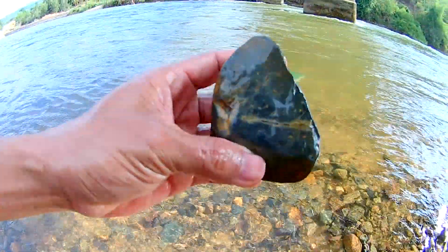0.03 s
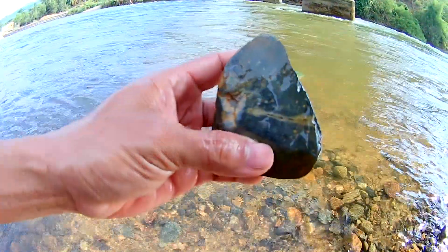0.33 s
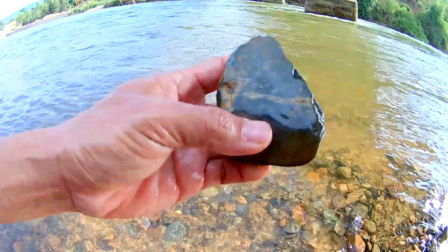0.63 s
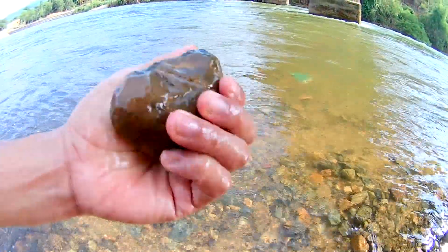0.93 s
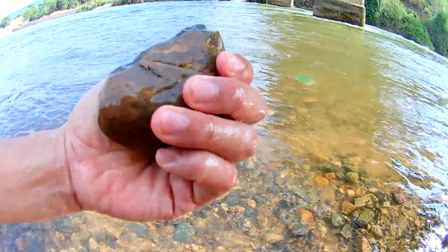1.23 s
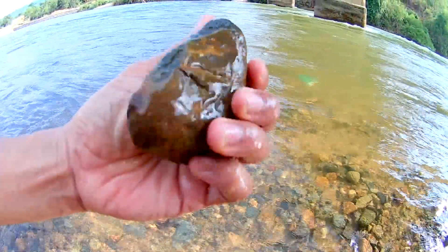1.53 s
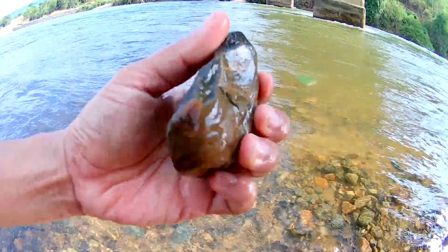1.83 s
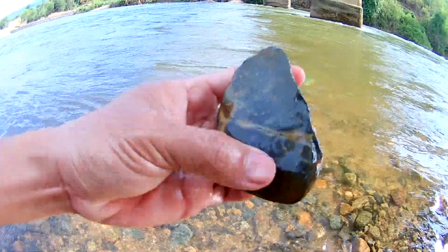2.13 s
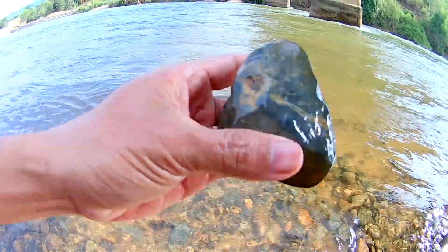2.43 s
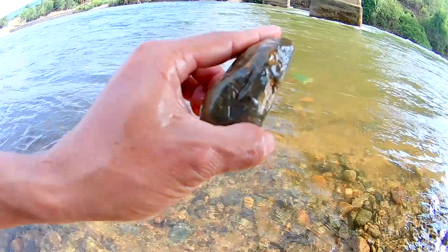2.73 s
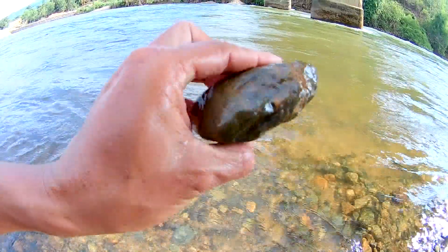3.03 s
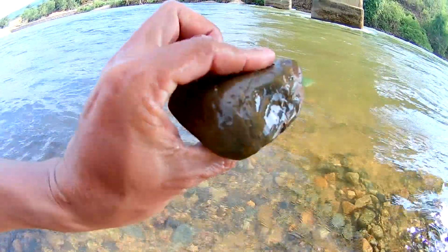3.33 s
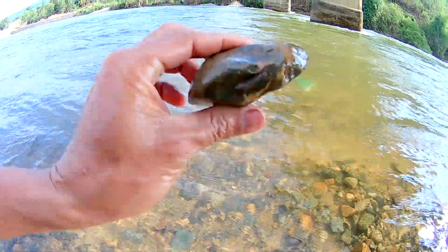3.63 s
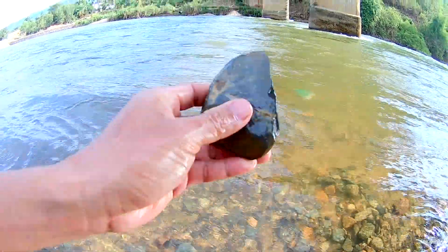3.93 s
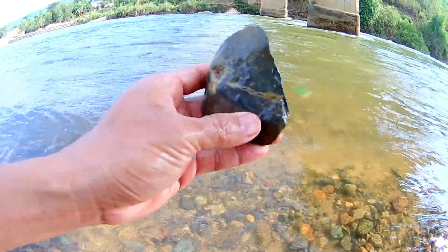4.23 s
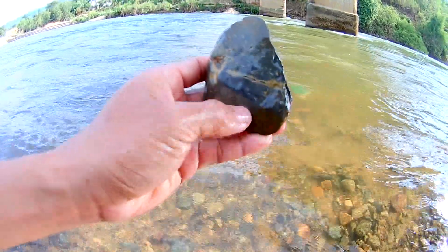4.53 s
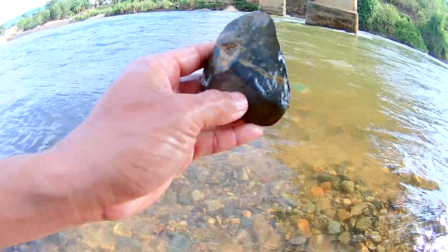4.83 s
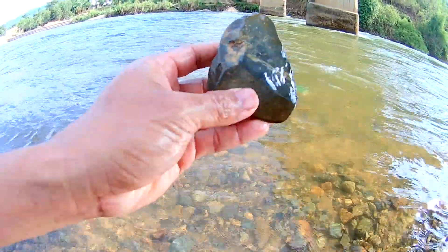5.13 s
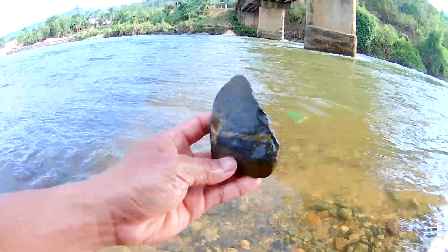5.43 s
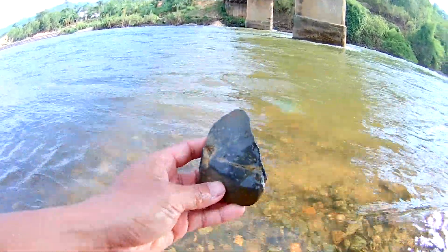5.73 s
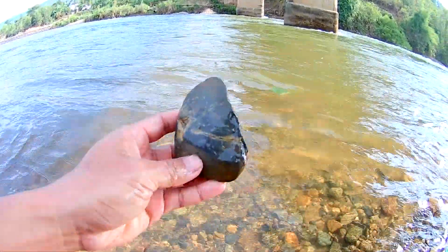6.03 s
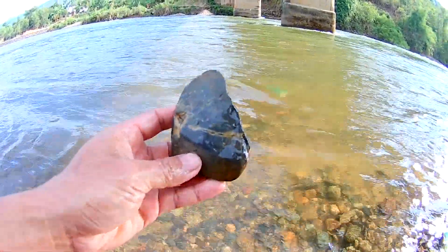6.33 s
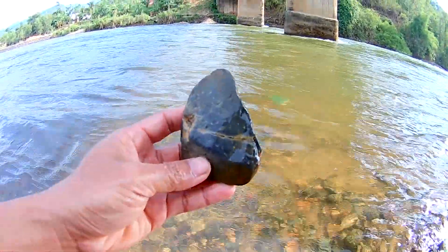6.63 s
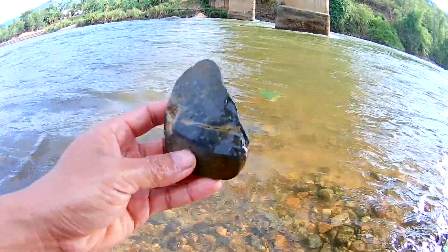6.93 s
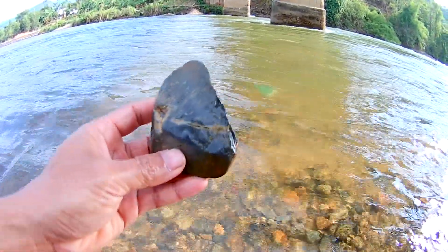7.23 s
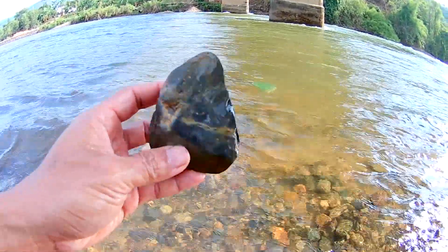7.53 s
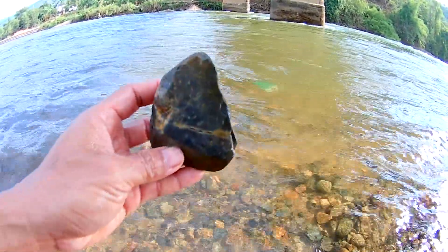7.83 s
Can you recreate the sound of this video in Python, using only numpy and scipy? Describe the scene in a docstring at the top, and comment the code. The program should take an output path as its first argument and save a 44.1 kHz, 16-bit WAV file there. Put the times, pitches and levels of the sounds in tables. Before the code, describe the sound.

A shallow river rushes steadily, with soft burbling among the pebbles, heard from one microphone on the bank near the water. Close by, a few drips plop and small wavelets lap with a light fizz, mostly around the middle. Faint wind rumbles on the microphone now and then. Near the end come two sharp knocks in quick succession, like taps on the camera housing, followed by a little more dripping.

```python
"""The bank of a shallow, pebbly river, heard from one microphone near the water.
Countless far bubbles merge into a rush, and nearer ones burble among the pebbles.
Close by, drips plop as trapped air rings, drops slap the surface and wavelets stir up spray and fizz.
Light air rumbles at the microphone now and then. Near the end come two sharp knocks,
like taps on the camera housing."""
import sys
import numpy as np
from scipy import signal
from scipy.fft import rfft, irfft
from scipy.io import wavfile
from scipy.ndimage import uniform_filter1d

SR = 44100
rng = np.random.default_rng(int(sys.argv[2]) if len(sys.argv) > 2 else 0)


def to_wav(s):
    """Save 16-bit WAV."""
    ch = np.atleast_2d(s).T  # columns
    pcm = np.round(np.clip(ch, -1, 1) * 32767)  # PCM
    wavfile.write(sys.argv[1], SR, pcm.astype(np.int16))


N = 347508
TIME = np.arange(N) / SR


def rush(level_db=-43, patchy_db=1.02, flicker_db=-0.37):
    """Countless far bubbles merge into a roar, combed by a reflection near the microphone."""
    # spectrum of the roar: frequency_hz, level_db
    roar_spectrum = [(20, -4.5), (70, -2), (160, 0), (400, -2.5), (650, -3), (1050, 0.5), (1450, -7),
                     (2000, -9), (2600, -19), (3400, -28), (4200, -24), (5500, -35), (6600, -41),
                     (8000, -47.5), (16000, -78)]
    # strength of the reflection: frequency_hz, share
    reflection = [(400, 0.041), (750, 0.14), (1100, 0.55), (1500, 0.56), (1900, 0.025), (3000, 0.027)]
    # strength of the current: time_s, level_db
    current = [(0, 1.5), (2.1, -0.75), (3.5, 0.76), (7.88, -.1)]
    frame, hop = 1024, 256
    hz, t = np.fft.rfftfreq(frame, 1 / SR), np.arange(N // hop + 5) * hop / SR
    shape = len(t), len(hz)
    noise = rng.standard_normal(shape) + 1j * rng.standard_normal(shape)
    churn_db = patchy_db * patches(shape, size=(8, 10)) + flicker_db * patches(shape, size=(5, 120))
    delay = np.exp(-2j * np.pi * np.outer(reflection_lag(t), hz))
    comb = abs(1 - spectrum(reflection, hz) * delay)
    noise *= comb * amp(spectrum(roar_spectrum, hz) + churn_db)
    roar = signal.istft(noise.T, nperseg=frame, noverlap=frame - hop)[1][:N]
    return amp(level_db + curve(current, TIME)) * unit(roar)


def reflection_lag(t, tilt_at_s=5.7, tilt_takes_s=0.5, before_s=0.001338, after_s=0.00181):
    """The camera tilts once, and the nearby reflection glides to a longer lag."""
    tilted = 0.5 + 0.5 * np.tanh((t - tilt_at_s) / (tilt_takes_s / 2))
    return before_s + (after_s - before_s) * tilted


def drips(deep_t60_at_1khz_s=0.043, ring_slope=0.59, climb_octaves=1.76):
    """Drips and ripples close to the microphone, each ringing one bubble."""
    # trapped bubbles: start_s, pitch_hz, level_db, rise_octaves_per_s
    bubbles = [(.445, 1770, -27, 5), (.947, 3120, -44, 33), (2.622, 2390, -35.5, 27),
               (3.223, 4050, -41, 20), (3.257, 3200, -41, 54), (3.267, 1100, -28, 55),
               (3.361, 5800, -51, 10), (3.857, 517, -24, 21), (3.874, 563, -21.5, 23),
               (3.927, 2070, -26.5, 46), (5.354, 5900, -49.5, 5), (5.399, 377, -27.5, 30),
               (5.4005, 1900, -23, 95), (5.4505, 680, -21, 10), (5.465, 1460, -27.5, 5),
               (5.502, 676, -30.5, 5), (7.354, 1256, -24.5, 3.5)]
    out = np.zeros(N)
    for s, hz, db, rise in bubbles:
        deep_t60 = deep_t60_at_1khz_s * (1000 / hz) ** ring_slope  # small bubbles die sooner
        t60 = 1 / (1 / deep_t60 + rise / climb_octaves)  # so do fast climbers, near the surface
        add(out, s, amp(db) * bubble(hz, t60, rise))
    return out


def splashes(slap_db=-5, slap_t60_s=0.019, tick_db=7, spray_db=-9, droplets_db=-7, droplets_per_s=130):
    """Close drops hit the water with a tick and a short slap, amid fine spray and scattered droplets."""
    # the loudest drops: start_s, level_db
    drops = [(.446, -47), (0.948, -48), (3.234, -42), (3.648, -43), (3.853, -38), (3.865, -39),
             (5.402, -33.5), (5.448, -39), (5.4655, -34), (5.491, -39), (6.687, -41), (7.335, -39),
             (7.353, -43), (7.459, -37)]
    # colour of slaps and spatter: frequency_hz, level_db
    wet_spectrum = [(300, -22), (1500, 5.5), (2300, 11.5), (3200, -1), (4300, 5), (6300, -7.5), (8000, -7),
                    (9300, -15), (12000, -31), (16000, -35)]
    t, stirred = np.arange(SR // 20) / SR, stir()
    strengths = amp(3.5 * np.minimum(rng.exponential(1, N), 3))
    droplets = strengths * (rng.random(N) < droplets_per_s / SR)
    ticks = amp(droplets_db) * stirred * unit(droplets)
    spray_envelope = amp(spray_db) * stirred
    for s, db in drops:
        add(spray_envelope, s, amp(db + slap_db) * np.exp(-np.log(1000) * t / slap_t60_s))
        add(ticks, s, amp([db + tick_db]))
    return colour(ticks + spray_envelope * rng.standard_normal(N), wet_spectrum)


def knocks(contact_s=0.0011, low_cut_hz=160):
    """Each blow sets the damped camera housing ringing; a close pair of modes lingers."""
    # blows, each on another spot: start_s, level_db
    blows = [(6.71, -1.5), (6.9247, 0)]
    # modes of the housing: pitch_hz, t60_s, first_blow_db, second_blow_db
    housing = [(420, 0.0039, -1.5, 1), (842, 0.0048, 15.5, 15.5), (1180, 0.0059, 14.5, 13.5),
               (1358, 0.011, 5, 5), (1476, 0.027, -11, -23), (1600, 0.059, -20, -21),
               (1840, 0.0088, -2, -2), (2420, 0.0075, -2, -3), (2650, 0.02, -28, -27),
               (3840, 0.002, 17, -26), (4110, 0.0076, -15, -13), (6380, 0.0032, -0.5, -16),
               (8895, 0.0033, -16, -14), (11500, .0023, -18, -25)]
    t, out = np.arange(SR // 10) / SR, np.zeros(N)
    hz, t60, *spots_db = np.transpose(housing)
    modes = np.sin(2 * np.pi * hz[:, None] * t) * np.exp(-np.log(1000) * t / t60[:, None])
    build_up = 1 - np.exp(-t / contact_s)
    for (s, db), spot_db in zip(blows, spots_db):
        add(out, s, amp(db + spot_db) @ modes * build_up)
    return signal.sosfilt(signal.butter(2, low_cut_hz, "high", fs=SR, output="sos"), out)


def babble(level_db=-57):
    """Bubbles burble among the pebbles, nearer than the roar."""
    return amp(level_db) * bubble_cloud(
        per_s=170, low_hz=802, high_hz=2296, spread_db=3.2, ring_cycles=20, rise=10, tilt=0.84)


def fizz(gain_db=-1):
    """Tiny bubbles crackle as the water at the bank is stirred."""
    cloud = bubble_cloud(
        per_s=700, low_hz=3420, high_hz=9900, spread_db=5.5, ring_cycles=14, rise=25, tilt=2.3)
    return amp(gain_db) * stir() * cloud


def stir(rise_s=0.047, fade_db_per_s=49, rest_db=-76.5):
    """How strongly the water at the bank is stirred: each wavelet rises quickly and settles."""
    # wavelets lapping the bank: start_s, level_db
    wavelets = [(3.19, -69), (3.6, -65), (3.85, -59.5), (5.44, -59.5), (7.1, -63.5), (7.28, -60.5)]
    power = amp(rest_db) ** 2
    for s, db in wavelets:
        age = TIME - s
        settled_db = fade_db_per_s * np.maximum(age - rise_s, 0)
        power += (np.clip(age / rise_s, 0, 1) * amp(db - settled_db)) ** 2
    return np.sqrt(power)


def breeze(calm_db=-63.5, lumpy_db=2):
    """Lumpy eddies rumble at the microphone port, swelling with each gust."""
    # puffs of air: crest_s, length_s, level_db
    gusts = [(2.8, 0.52, -49), (3.677, 0.47, -45), (5.15, 0.73, -50.5), (7.05, 2, -52)]
    lumps = unit(lowpass(rng.standard_normal(N), hz=7.4, order=2))
    eddies = colour(rng.standard_normal(N),
                    [(8, -15), (35, 0), (90, -3), (220, -17), (900, -55), (4000, -90)])
    power = sum(amp(db) ** 2 * np.exp(-2 * ((TIME - s) / (length / 2)) ** 2) for s, length, db in gusts)
    return np.sqrt(amp(calm_db) ** 2 + power) * unit(eddies * amp(lumpy_db * lumps))


def bubble(hz, t60, rise, swell_cycles=0.88):
    """A pocket of air rings, climbing by `rise` octaves a second as it nears the surface."""
    t = np.arange(int(t60 * SR) + 2) / SR
    cycles = np.cumsum(hz * 2 ** (rise * t)) / SR
    swell = 1 - np.exp(-cycles / swell_cycles)
    return np.sin(2 * np.pi * cycles) * swell * np.exp(-np.log(1000) * t / t60)


def bubble_cloud(per_s, low_hz, high_hz, spread_db, ring_cycles, rise, tilt):
    """Bubbles of random size at random moments; the small ones are high and faint."""
    out = np.zeros(N)
    for when, smallness, chance in rng.random((int(per_s * N / SR), 3)):
        hz = low_hz * (high_hz / low_hz) ** smallness
        strength = amp(spread_db * min(-np.log(1 - chance), 3)) * (low_hz / hz) ** tilt
        add(out, when * N / SR, strength * bubble(hz, ring_cycles / hz, rise))
    return unit(out)


def amp(db):
    """Decibels to gain."""
    return 10 ** (np.asarray(db) / 20)


def unit(x):
    """Scales to rms 1."""
    return x / np.sqrt(np.mean(x ** 2) + 1e-20)


def curve(rows, t):
    """Reads (time_s, value) rows at times t."""
    return np.interp(t, *np.transpose(rows))


def spectrum(rows, hz):
    """Reads (frequency_hz, value) rows on a log-frequency axis."""
    f, value = np.transpose(rows)
    return np.interp(np.log(hz + 1), np.log(f + 1), value)


def colour(x, rows):
    """Filters by (frequency_hz, level_db) rows, keeping the power of white noise."""
    gain = unit(amp(spectrum(rows, np.fft.rfftfreq(N, 1 / SR))))
    return irfft(rfft(x) * gain, N)


def lowpass(x, hz, order):
    """A causal low-pass."""
    return signal.sosfilt(signal.butter(order, hz, fs=SR, output="sos"), x)


def add(mix, s, sound):
    """Mixes a sound in at time s."""
    part = mix[max(round(s * SR), 0):][:len(sound)]
    part += sound[:len(part)]


def patches(shape, size):
    """Random patches, smoothed over size = (time frames, frequency bins)."""
    smooth_in_time = uniform_filter1d(rng.standard_normal(shape), size[0], 0)
    return unit(uniform_filter1d(smooth_in_time, size[1], 1))


def scene():
    """River, bank and camera, heard in mono from one spot."""
    return (rush() + babble() + drips() + fizz() + splashes() + breeze() + knocks())[None]


def record(dry, treble_dip_hz=8100, dip_width_hz=2400, hiss_db=-76.5, band_edge_hz=15800):
    """Soft overload, a dip near 8 kHz that dulls the knocks' top, faint hiss, then a band limit."""
    # the microphone's own hiss: frequency_hz, level_db
    hiss_spectrum = [(8000, 0.5), (12000, -1), (15500, 2.5)]
    treble_dip = signal.iirnotch(treble_dip_hz, treble_dip_hz / dip_width_hz, fs=SR)
    heard = signal.lfilter(*treble_dip, np.tanh(dry))
    heard += amp(hiss_db) * colour(rng.standard_normal(N), hiss_spectrum)
    band_limit = signal.firwin(511, band_edge_hz, window=("kaiser", 9), fs=SR)
    return signal.oaconvolve(heard, band_limit[None], "same")


dry = scene()
out = record(dry)
to_wav(out)
```